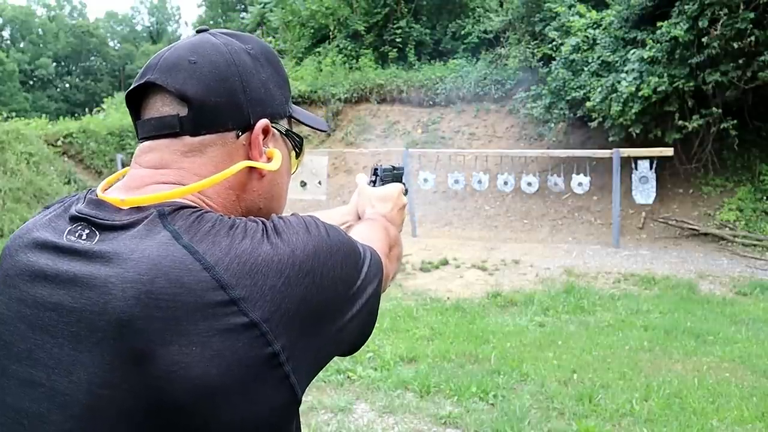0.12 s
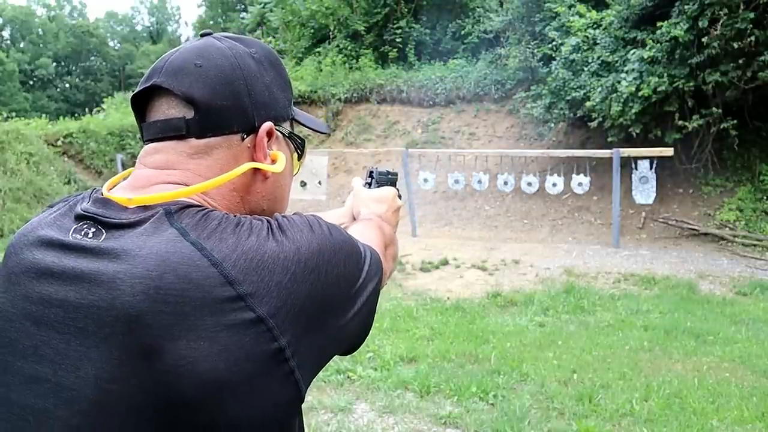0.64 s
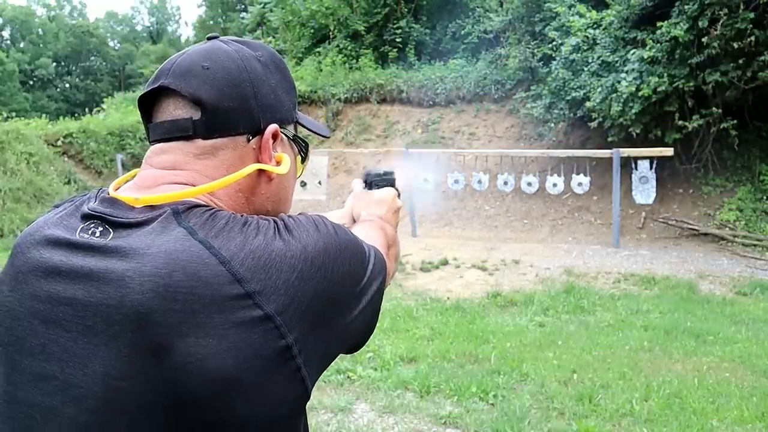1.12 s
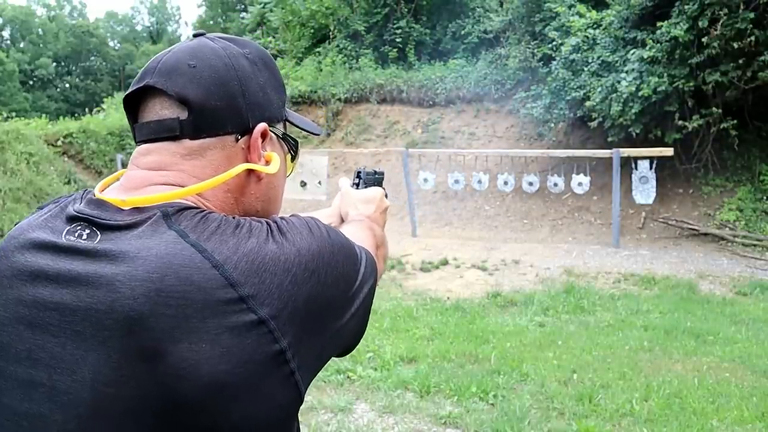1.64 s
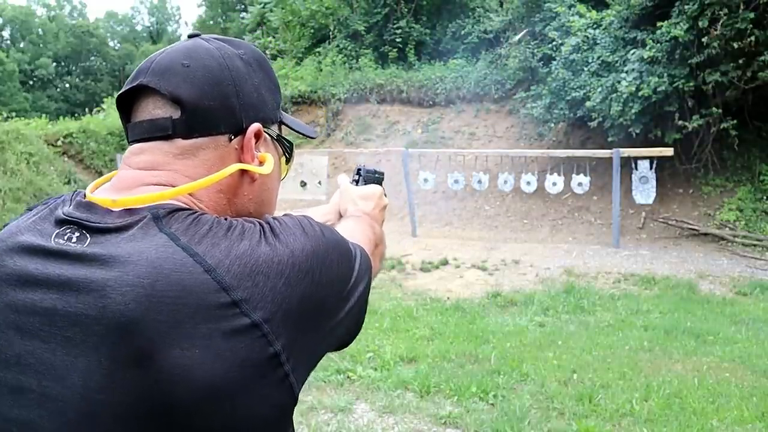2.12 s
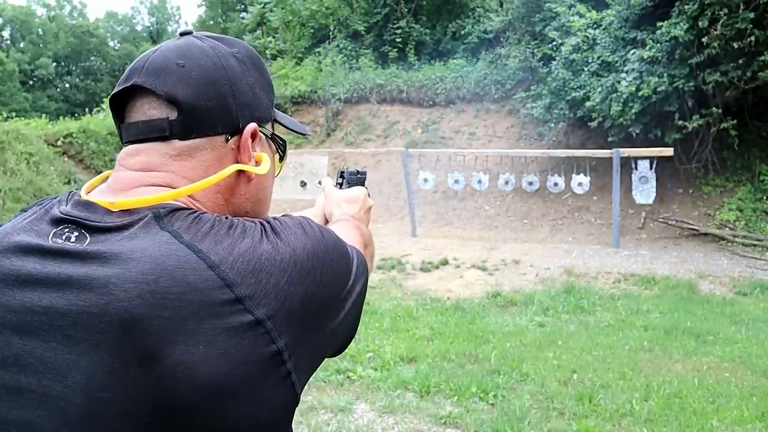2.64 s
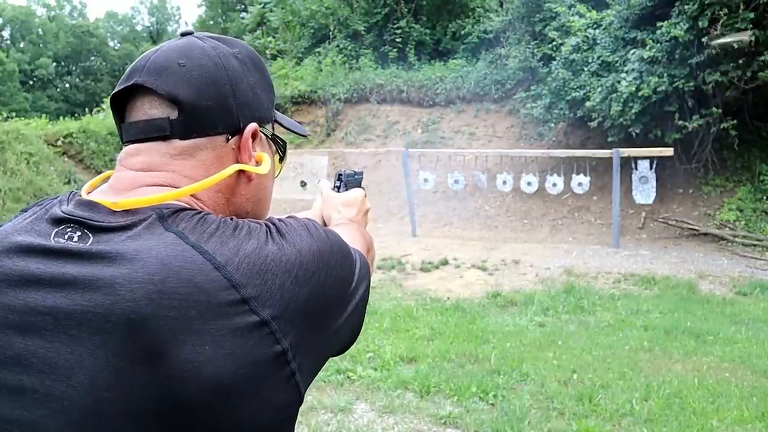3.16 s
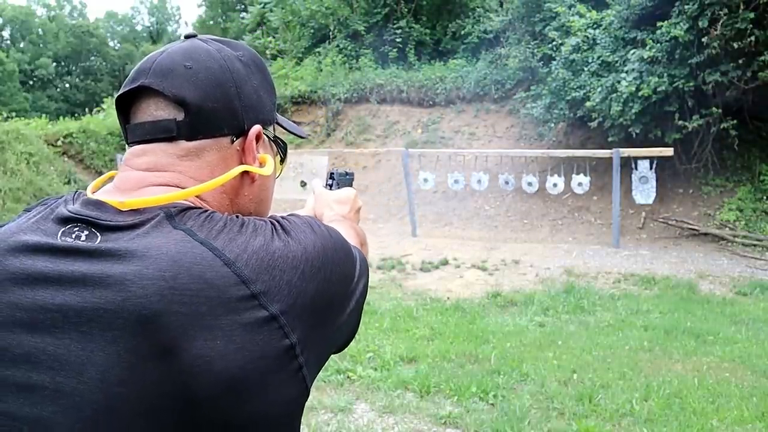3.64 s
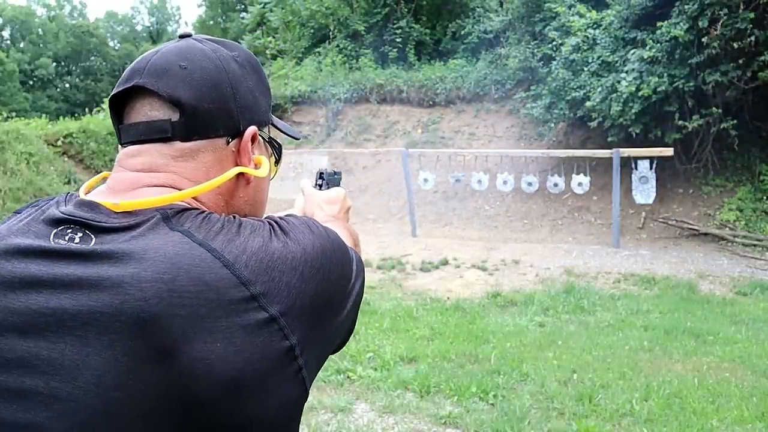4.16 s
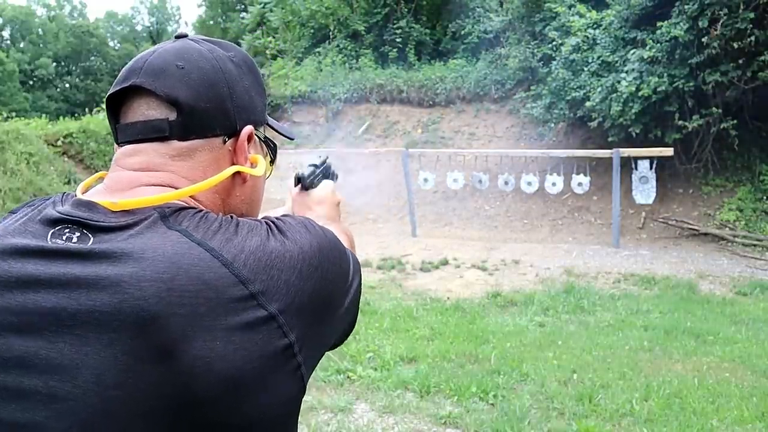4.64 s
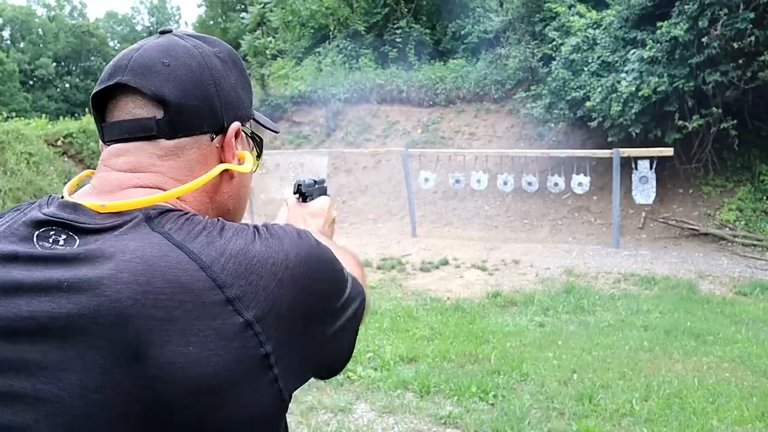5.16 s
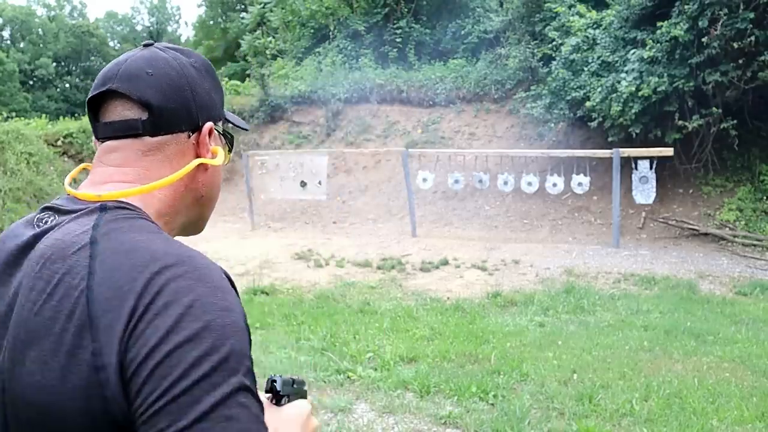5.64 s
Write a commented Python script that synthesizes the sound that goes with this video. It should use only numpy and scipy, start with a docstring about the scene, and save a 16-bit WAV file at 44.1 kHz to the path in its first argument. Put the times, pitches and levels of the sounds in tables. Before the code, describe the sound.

Close beside the shooter, a pistol fires six times on a grassy outdoor range. Each blast is followed almost instantly by a bullet cracking and thudding on a hanging steel plate, then bright wavering ringing and a swelling roll from earth bank and woods. The close microphone overloads. Faint hush lies beneath, and cloth rustles softly at the end.

```python
"""A pistol fires six times on a grassy range: noise bursts for the gas, shock fronts for the slaps
off ground and earth bank, and scattered noise for the woods' swelling, dulling roll.
Each bullet cracks and thuds on another hanging steel plate, which rings in beating, dying sines.
A far hush, microphone hiss, faint ticks and a late cloth rustle lie beneath; the close input overloads."""
import sys
import numpy as np
from scipy import signal
from scipy.fft import rfft, irfft
from scipy.io import wavfile

SR = 44100
rng = np.random.default_rng(int(sys.argv[2]) if len(sys.argv) > 2 else 0)


def nominal_scale(level):
    """Amplitude ratio for a level in decibels (scalar or array-like)."""
    x = np.asarray(level, float) / 20
    return 10 ** x


def master_out(mix):
    """Clip the mix to full scale and print it as 16-bit PCM to the path in sys.argv[1]."""
    frames = np.transpose(np.atleast_2d(mix))
    ceiling = np.clip(frames, -1, 1)
    pcm = np.round(ceiling * 32767).astype(np.int16)
    wavfile.write(sys.argv[1], SR, pcm)


N = 255272  # samples


def evened(x):
    """Scales a signal to unit rms."""
    return x / np.sqrt(np.mean(x ** 2) + 1e-20)


def read(points, hz):
    """Interpolates a (f/Hz, value) table over log frequency."""
    f, value = np.transpose(points)
    return np.interp(np.log(hz + 1), np.log(f + 1), value)


def coloured(x, colour):
    """Multiplies the spectrum of x by a real gain per bin."""
    return irfft(rfft(x) * colour, len(x))


def add(mix, start_s, sound):
    """Adds a sound into the mix in place, cut at the end."""
    part = mix[round(start_s * SR):][:len(sound)]
    part += sound[:len(part)]


def band_noise(size, hz, width_hz):
    """Unit-rms noise around hz with sloping skirts, amplitude halved at the band edges."""
    f = np.fft.rfftfreq(size, 1 / SR)
    skirts = 1 / (1 + ((f - hz) / (.5 * width_hz)) ** 2)
    return evened(coloured(rng.standard_normal(size), skirts))


def burst(db, rise_s, hold_s, t60_s, hz, width_hz):
    """A puff of turbulence: band noise that rises, holds and dies exponentially."""
    t = np.arange(4096) / SR
    decay_db = -60 * np.maximum(t - rise_s - hold_s, 0) / t60_s
    shape = np.minimum(t / rise_s, 1) * nominal_scale(db + decay_db)
    return shape * band_noise(len(t), hz, width_hz)


def front(db, length_s, edge_s=.00006):
    """A shock front: steep push, then suction after length_s; edge_s softens the step."""
    t = np.arange(1024) / SR
    return nominal_scale(db) * (1 - np.exp(-t / edge_s)) * (1 - t / length_s) * np.exp(-t / length_s)


def hush():
    """Steady far hush: stationary noise with a fixed spectrum."""
    # hush spectrum before levelling: f/Hz, relative density/dB per Hz
    hush_colour = [(18, -40.5), (30, -29.5), (59, -12.5), (111, -9), (165, -17.5), (279, -10.5), (471, 5.5),
                   (537, 0.5), (2800, -14.5), (10400, -40.5), (15800, -54.5)]
    gain = nominal_scale(read(hush_colour, np.fft.rfftfreq(N, 1 / SR)))
    return nominal_scale(-47) * evened(coloured(rng.standard_normal(N), gain))


def microphone_hiss():
    """Microphone self-noise: white noise at -84 dB rms."""
    return nominal_scale(-84) * rng.standard_normal(N)


def rustle():
    """Clothing moves near the end: broad noise under a level curve."""
    # rustle envelope: t/s, level/dB
    rustle_curve = [(5.549, -69.5), (5.629, -65.5), (5.678, -62), (5.74, -60), (5.79, -54.5)]
    s, db = np.transpose(rustle_curve)
    return nominal_scale(np.interp(np.arange(N) / SR, s, db, left=-120)) * band_noise(N, 2000, 9000)


def ticks():
    """Small faint ticks: short treble bursts."""
    # ticks: t/s, level/dB
    tick_times = [(1.039, -75), (1.1894, -63), (5.3944, -52.5)]
    out = np.zeros(N)
    for s, db in tick_times:
        add(out, s, burst(db, 0.00022, .0005, .012, 7500, 7000))
    return out


def minor_modes(count=32):
    """Dense weak, quickly dying upper modes, drawn anew for each plate."""
    place, weakness, beat, twin = rng.random((count, 4)).T
    hz = 5000 + 10000 * place
    db = -37 - 10 * weakness
    t60_s = 0.3 * (1.5 - place)
    beat_hz = 5 + 25 * beat
    twin_share = .8 * (2 * twin - 1)
    return list(np.transpose((hz, db, t60_s, beat_hz, twin_share)))


def ring(modes):
    """Dying sines beat with twins; the swinging plate beams tones past the listener, then turns away."""
    sway_db, sway_rise_s, attack_s, turn_s = 2., 0.087, .002, .3
    t = np.arange(SR) / SR
    out = np.zeros(len(t))
    for hz, db, t60_s, beat_hz, twin_share in modes:
        start, *phases = rng.random(5)  # cycles
        sway = sum(np.sin(2 * np.pi * (f * t + p)) for f, p in zip(np.geomspace(8, 40, 4), phases))
        swing_db = sway_db * sway * np.minimum(t / sway_rise_s, 1)
        pair = 1 + twin_share * np.exp(2j * np.pi * beat_hz * t)
        tone = (pair * np.exp(2j * np.pi * (hz * t + start))).real
        out += nominal_scale(db - 60 * t / t60_s + swing_db) * tone
    return out * np.minimum(t / attack_s, 1) / (1 + (t / turn_s) ** 4)


def ring_echo(rings):
    """The woods scatter the ring: convolution with swelling noise that decays by frequency."""
    # decay of the scattered ring: f/Hz, t60/s
    echo_t60 = [(2500, 1.1), (6000, 1.1), (10000, .7), (14000, .35)]
    echo_db, swell_s = -18, .22
    hz, t, z = signal.stft(rng.standard_normal(SR), SR, nperseg=256)
    decay = nominal_scale(-60 * t / read(echo_t60, hz)[:, None]) * np.minimum(t / swell_s, 1) ** 2
    woods = signal.istft(z * decay, SR, nperseg=256)[1]
    return nominal_scale(echo_db) * signal.fftconvolve(rings, woods / np.linalg.norm(woods))[:N]


def strike(hits, s, crack_db, thud_db):
    """The bullet shatters: a crack heard directly and off the ground, a thud, spraying fragments."""
    bounce_s, bounce_db = .0013, -2
    for delay_s, db in ((0, 0), (bounce_s, bounce_db)):
        add(hits, s + delay_s, -front(crack_db + db + 3, .00015, .00002))
        add(hits, s + delay_s, burst(crack_db + db - 14.5, .0001, 0.0006, 0.007, 2500, 9900))
    add(hits, s, -front(thud_db, 0.002, .0002))
    add(hits, s, burst(crack_db - 35, .001, 0.005, .08, 8000, 12000))  # fragments


def plates():
    """Six plates, each struck once; the steel rings on into the woods."""
    # strikes as heard: t/s, crack/dB, thud/dB, ring/dB
    strike_list = [(0.0938, 6.5, -5.5, 0.5), (1.2921, 1.5, -7, -1), (2.1995, 4, -4, 0.9),
                   (3.1433, 2.5, -7.5, 0.7), (3.9478, 2.5, -12.5, 0.5), (4.7968, 1.5, -2, -0.2)]
    # modes, one list a plate: f/Hz, level re ring/dB, t60/s, twin offset/Hz,
    # twin share/1 (negative: starts opposed)
    plate_modes = [
        [(2770, -24, 2.5, 2.0, 0.45), (2898, -35, 1.91, 11.2, -0.3), (3101, -36, 1.46, 4.0, -0.6),
         (3811, -29, 1.12, 4.0, -0.75), (4075, -29, 2.5, 6.3, -0.3), (4801, -21, 1.46, 7.9, -0.15),
         (5083, -27, 0.85, 17.7, -0.15), (5785, -37, 2.5, 5.6, 0.6), (6017, -37, 2.5, 28.0, 0.15),
         (6659, -26, 1.12, 5.6, 0.6), (7148, -34, 2.5, 5.6, 0.75), (7462, -31, 0.65, 5.6, 0.9),
         (8442, -22, 0.29, 8.9, 0.9), (9348, -24, 0.85, 5.6, 0.75), (10972, -34, 0.65, 6.3, 0.75),
         (13556, -42, 1.12, 10.0, 0.75)],
        [(2894, -34, 2.5, 2.0, -0.45), (4829, -23, 1.91, 4.0, -0.75), (5756, -39, 1.12, 10.0, -0.9),
         (5894, -37, 0.85, 8.9, -0.9), (6011, -44, 2.5, 4.5, -0.9), (6656, -28, 1.12, 5.0, 0.9),
         (7163, -30, 1.12, 7.1, -0.9), (9314, -31, 0.65, 22.3, -0.3), (9666, -29, 0.65, 10.0, -0.9),
         (10983, -43, 0.22, 11.2, -0.9), (12353, -40, 0.5, 7.9, -0.15), (12464, -40, 0.38, 10.0, -0.9),
         (12820, -28, 0.22, 14.1, -0.9), (13194, -37, 0.29, 12.5, -0.9), (13554, -46, 0.5, 10.0, -0.9),
         (14328, -40, 0.17, 14.1, -0.9)],
        [(2898, -29, 1.12, 4.5, 0.9), (4091, -39, 2.5, 10.0, 0.9), (4842, -33, 1.46, 8.9, 0.6),
         (5897, -39, 2.5, 5.6, 0.9), (6686, -32, 0.65, 6.3, 0.9), (7183, -22, 0.5, 10.0, -0.6),
         (8481, -28, 0.85, 25.0, 0.3), (9299, -34, 0.85, 5.6, 0.9), (9384, -29, 0.65, 17.7, -0.45),
         (10506, -41, 0.85, 6.3, 0.6), (12365, -29, 0.17, 25.0, 0.45), (12473, -27, 0.17, 17.7, -0.9),
         (12819, -31, 0.13, 8.9, 0.9), (13212, -38, 0.17, 15.8, -0.9), (13684, -45, 0.65, 19.8, -0.6),
         (14409, -44, 0.22, 25.0, -0.45)],
        [(3100, -27, 0.22, 7.9, -0.9), (3355, -42, 2.5, 2.2, -0.9), (4089, -27, 1.46, 7.9, 0.45),
         (5083, -28, 0.17, 15.8, -0.75), (5772, -40, 2.5, 4.5, 0.9), (6023, -31, 1.12, 15.8, 0.3),
         (6655, -17, 0.17, 17.7, -0.6), (7158, -30, 1.12, 19.8, -0.45), (7453, -29, 0.85, 6.3, 0.3),
         (9296, -25, 0.29, 10.0, 0.45), (9635, -34, 1.12, 5.6, 0.75), (10460, -46, 1.12, 19.8, -0.45),
         (11230, -36, 0.38, 8.9, 0.45), (12339, -45, 0.85, 22.3, -0.45), (13641, -38, 0.5, 2.8, -0.9),
         (14350, -48, 0.5, 28.0, -0.45)],
        [(2832, -35, 2.5, 8.9, 0.9), (2959, -36, 2.5, 4.5, 0.6), (4953, -30, 2.5, 10.0, 0.6),
         (5235, -32, 0.65, 7.1, 0.9), (5896, -37, 2.5, 12.5, 0.9), (6074, -30, 2.5, 4.0, -0.9),
         (6824, -40, 2.5, 5.0, 0.45), (7347, -40, 1.46, 5.6, 0.6), (7675, -39, 1.12, 7.9, -0.9),
         (9537, -42, 1.91, 5.6, 0.6), (9897, -36, 1.91, 5.6, 0.6), (11244, -39, 0.22, 11.2, 0.9),
         (12741, -35, 0.38, 5.6, 0.9), (13111, -31, 0.13, 19.8, -0.6), (13493, -21, 0.17, 2.5, -0.3),
         (13871, -29, 0.5, 2.8, -0.75)],
        [(3161, -35, 1.12, 10.0, 0.75), (3891, -43, 2.5, 12.5, -0.9), (4905, -40, 0.85, 14.1, 0.6),
         (5799, -37, 1.46, 19.8, -0.45), (6089, -34, 1.46, 14.1, 0.3), (7282, -41, 1.12, 19.8, -0.75),
         (8600, -34, 1.91, 3.5, -0.45), (9448, -35, 1.46, 7.1, 0.45), (9788, -51, 2.5, 6.3, 0.9),
         (10657, -45, 1.46, 5.0, 0.45), (11162, -49, 2.5, 6.3, 0.6), (11419, -42, 0.22, 15.8, 0.9),
         (12518, -24, 0.13, 15.8, 0.45), (12994, -46, 0.22, 11.2, -0.9), (13356, -40, 0.13, 19.8, -0.75),
         (13820, -41, 0.38, 25.0, -0.9)],
    ]
    hits, rings = np.zeros(N), np.zeros(N)
    for (s, crack_db, thud_db, ring_db), modes in zip(strike_list, plate_modes):
        strike(hits, s, crack_db, thud_db)
        add(rings, s, nominal_scale(ring_db) * ring(list(modes) + minor_modes()))
    return hits + rings + ring_echo(rings)


def echoes():
    """Scatter: a smooth wash from leaves and, in the lower bands, lumpier returns from trunks."""
    size, lump, trunk_hz = round(1.3 * SR), 200, 1300  # lump in samples
    lump_db = 3.5 * np.minimum(rng.exponential(1, size // lump + 1), 3.5)
    strong = nominal_scale(lump_db).repeat(lump)[:size]
    trunk = 1 / (1 + (np.fft.rfftfreq(size, 1 / SR) / trunk_hz) ** 2)  # power share
    lumps = evened(rng.standard_normal(size) * strong)
    wash = rng.standard_normal(size)
    return coloured(lumps, np.sqrt(trunk)) + coloured(wash, np.sqrt(1 - trunk))


def paths(t, column, start_s, rise_s, db, db_per_s):
    """Level in dB of a fading crowd of echoes that sets in softly, plus groups that stand out."""
    # scatterers from near grass and earth bank to far tree lines: delay/s, spread/s, body/dB, treble/dB
    return_groups = [(0.012, 0.0086, -30.5, -16.5), (.058, 0.0074, -22, -30.5),
                     (0.074, 0.019, -21.5, -34.5), (.197, 0.013, -21, -40.5), (0.232, 0.013, -16, -44),
                     (0.272, 0.01, -18, -40), (.313, 0.03, -24, -43.5), (.45, 0.015, -25.5, -54),
                     (.65, 0.037, -29.5, -68)]
    end_s, end_db = 1.3, -16  # the roll fades out towards its end
    crowd = nominal_scale(db + db_per_s * (t - start_s)) / (1 + np.exp(-(t - start_s) / rise_s))
    groups = sum(nominal_scale(row[column]) ** 2 * np.exp(-((t - row[0]) / row[1]) ** 2)
                 for row in return_groups)
    return 10 * np.log10(crowd ** 2 + groups + 1e-12) + end_db * (t / end_s) ** 8


def roll(scatter):
    """Shapes the scatter: the longer the path, the more treble the air has taken."""
    # how far a band follows the treble level instead of the body level: f/Hz, share/1
    treble_share = [(60, .6), (180, .5), (400, .05), (1200, .05), (2500, .25), (5000, .45), (8000, .7),
                    (11000, .95), (15000, 1.08)]
    # roll spectrum before normalising: f/Hz, relative density/dB per Hz
    roll_colour = [(18, -60), (30, -37.5), (279, -12), (372, -3.5), (424, -6), (717, -3.5), (957, -3.5),
                   (1210, -5.5), (1660, -13.5), (2210, -9), (2590, -10.5), (8220, -19), (13500, -38),
                   (15800, -41.5)]
    treble_offset_db = 13  # added to the treble level
    hz, t, z = signal.stft(scatter, SR, nperseg=256, noverlap=192)
    body_db = paths(t, column=2, start_s=.17, rise_s=0.044, db=-17.5, db_per_s=-28.5)  # trunks
    treble_db = paths(t, column=3, start_s=0.11, rise_s=.05, db=-28.5, db_per_s=-57)  # foliage
    share = read(treble_share, hz)[:, None]
    gain = nominal_scale((1 - share) * body_db + share * (treble_db + treble_offset_db))
    shaped = signal.istft(z * gain, SR, nperseg=256, noverlap=192)[1]
    colour = nominal_scale(read(roll_colour, np.fft.rfftfreq(len(shaped), 1 / SR)))
    return coloured(shaped, evened(colour))


def blast(out, s, db):
    """Turbulence: action, first gas, muzzle jet, then noisy returns off ground and bank."""
    # parts of a shot: delay/s, level re shot/dB, rise/s, hold/s, t60/s, centre f/Hz, width/Hz
    burst_parts = [(-.0027, -16, .0003, .0005, .008, 4500, 6000),
                   (-.001, -11, .001, .0002, .004, 7500, 8000), (.0004, 5, .0006, .0016, .004, 3700, 6000),
                   (0, -9, .0007, .0021, .02, 11000, 9000), (.0003, -9, .001, .003, .025, 1000, 1500),
                   (.0068, -10, .0003, .003, .04, 3500, 6000), (.0068, -9, .0005, .006, .05, 1100, 1300),
                   (.0433, -20, .0002, .003, .015, 4000, 6000), (.066, -16, .008, .012, .03, 600, 400),
                   (.044, -30, .004, .01, .15, 90, 120)]
    for delay_s, part_db, *shape in burst_parts:
        add(out, s + delay_s, burst(db + part_db, *shape))


def slaps(out, s, db):
    """Pressure fronts sent back by ground and earth bank, some inverted."""
    # fronts: delay/s, level re shot/dB, sign/1, length/s
    slap_fronts = [(.0069, 2, 1, .0006), (.0433, -2, -1, .0003), (.0440, -6, -1, .0004),
                   (.0450, 4, -1, .0003), (.0453, 2, 1, .0005), (.0459, 3, -1, .0007),
                   (.0478, -2, -1, .0007)]
    for delay_s, part_db, sign, length_s in slap_fronts:
        add(out, s + delay_s, sign * front(db + part_db, length_s))


def gun():
    """Each shot: gas bursts, slaps from ground and bank, then the roll of the woods."""
    # shots: muzzle blast t/s, strength/dB
    shot_list = [(0.0428, -1.53), (1.2410, -1.3), (2.1492, 0), (3.0915, 0.15), (3.8969, -0.56),
                 (4.7440, 0.13)]
    same = 0.72  # amplitude share of the scatter that every shot repeats, the trees standing still
    out, trees = np.zeros(N), echoes()
    for s, db in shot_list:
        blast(out, s, db)
        slaps(out, s, db)
        scatter = same * trees + np.sqrt(1 - same ** 2) * echoes()
        add(out, s, nominal_scale(db) * roll(scatter))
    return out


def scene():
    """Sums background, plates and gun into one channel."""
    background = hush() + microphone_hiss() + rustle() + ticks()
    return (background + plates() + gun())[None]


def top_cut(x):
    """Nothing passes above the cut-off."""
    return signal.sosfilt(signal.butter(12, 15990, fs=SR, output="sos"), x)


def record(dry):
    """The input overloads: a hard knee bends the signal towards full scale."""
    full, knee = .99, 10
    mix = dry / (1 + abs(dry / full) ** knee) ** (1 / knee)
    return top_cut(mix)


dry = scene()
out = record(dry)
master_out(out)
```